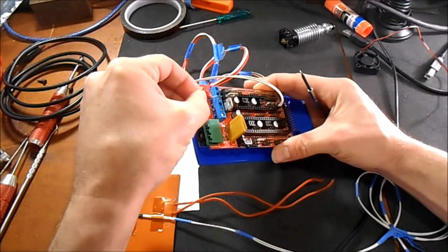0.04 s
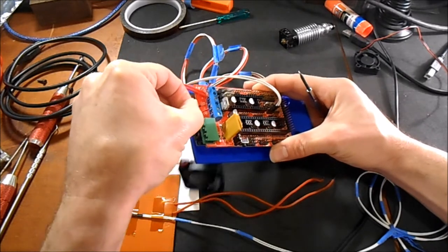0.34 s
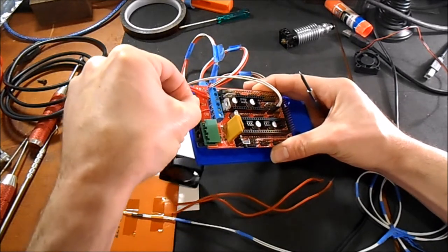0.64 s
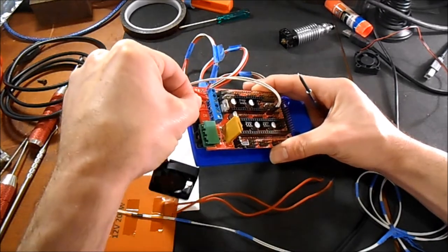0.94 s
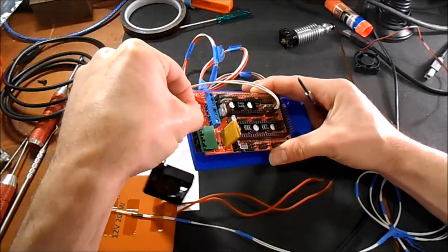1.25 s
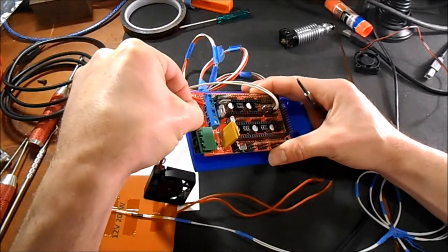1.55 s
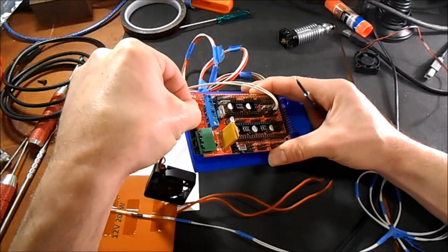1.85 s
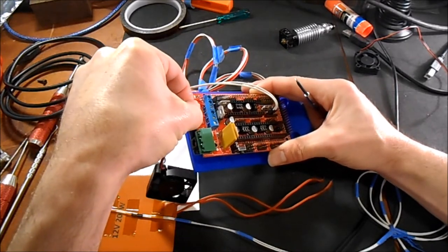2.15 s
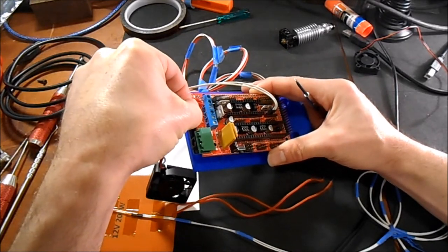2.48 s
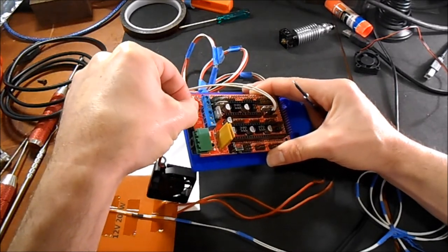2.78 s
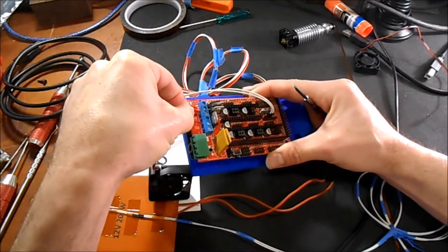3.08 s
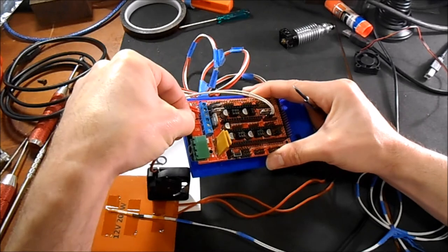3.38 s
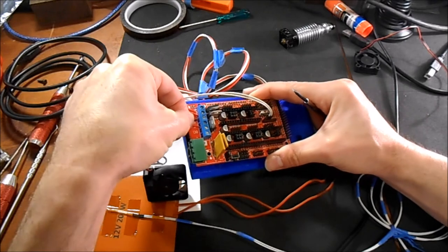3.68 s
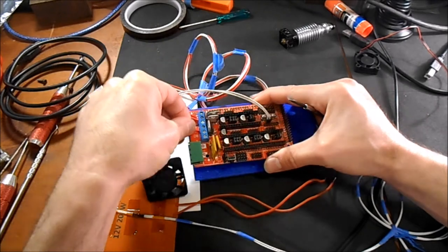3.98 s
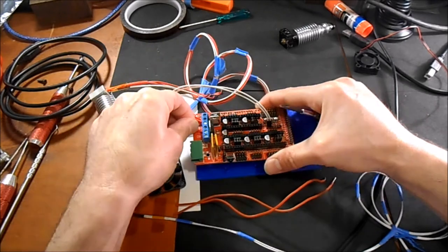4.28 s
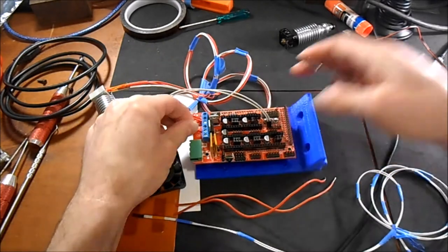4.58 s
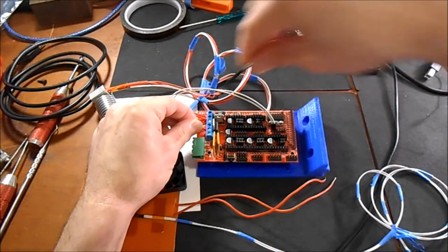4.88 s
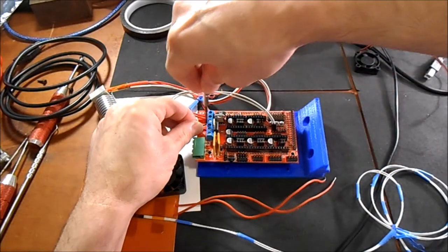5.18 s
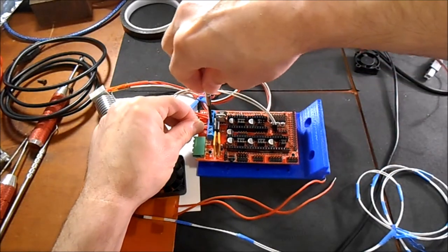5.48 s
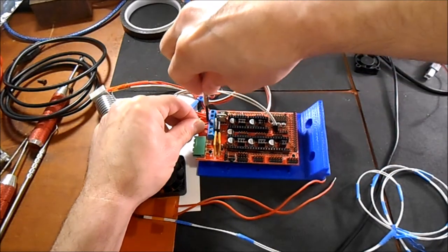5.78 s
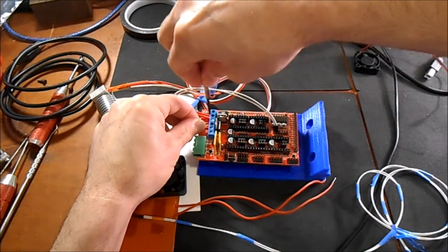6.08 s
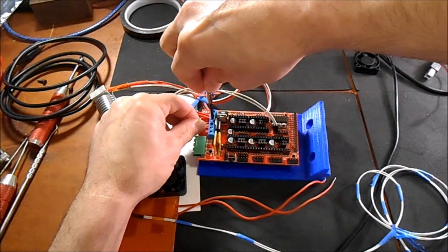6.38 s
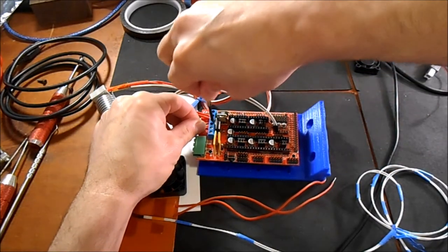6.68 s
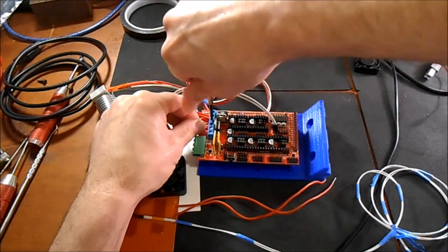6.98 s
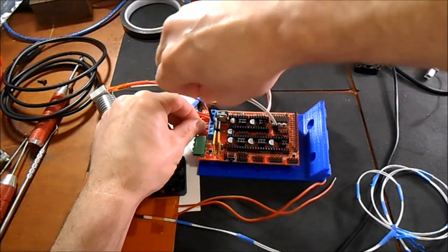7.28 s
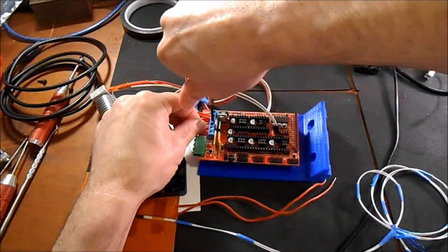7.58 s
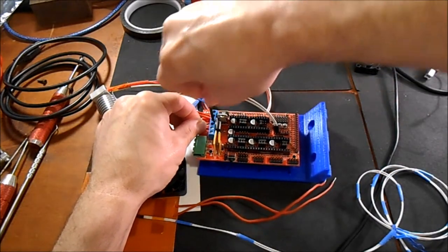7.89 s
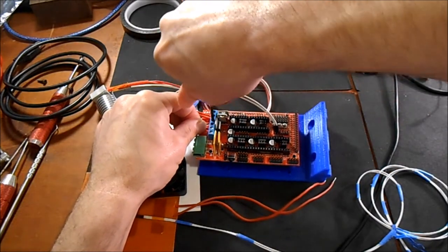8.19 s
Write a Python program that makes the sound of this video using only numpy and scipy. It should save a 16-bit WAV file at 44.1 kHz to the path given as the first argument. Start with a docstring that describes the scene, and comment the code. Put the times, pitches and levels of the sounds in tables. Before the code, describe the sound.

Light, bright clicks of wires and a small screwdriver working at screw terminals, close up, with a faint steady fan behind.

```python
"""Wiring screw terminals at a workbench

One microphone, close to a circuit board in a small room. Wire ends and plugs tick brightly as
they are pushed into the terminals, and insulation rubs in between. Later a small screwdriver
knocks and slips in the screw slots and makes the board ring. The room answers each click,
and a faint fan runs steadily behind."""
import sys
import numpy as np
from scipy import signal
from scipy.fft import rfft, irfft
from scipy.io import wavfile

SR = 44100
rng = np.random.default_rng(int(sys.argv[2]) if len(sys.argv) > 2 else 0)


def store_wav(level_fs):
    """Save 16-bit WAV to argv[1]."""
    pcm = np.round(np.clip(np.atleast_2d(level_fs), -1, 1) * 32767)
    wavfile.write(sys.argv[1], SR, pcm.T.astype(np.int16))


N = 372644

# spectral shape of the fan's rush: frequency_hz, relative_db
FAN_SPECTRUM = [(20, 6.5), (55, 5), (100, -3), (200, 1.5), (400, 1), (1000, -1.5), (1500, 3), (2200, -0.5),
                (3000, -0.5), (4000, -2.5), (6500, -5), (8200, -2.5), (10500, -9)]
# resonances of the fan housing: pitch_hz, width_hz, gain_db
HOUSING_MODES = [(601, 11, -1), (1780, 26, 4.5), (2700, 110, 1)]
# thin whines of the fan: pitch_hz, width_hz, gain_db
FAN_WHINES = [(3720, 12, 3), (4920, 12, 2), (5280, 12, 4), (6720, 14, 2), (9480, 10, 5)]
# resonances of the board and its terminals: pitch_hz, width_hz, gain_db
BOARD_MODES = [(1336, 24, -5.5), (1452, 81, -1), (1605, 98, -2.5), (1698, 57, -1), (1790, 23, 3),
               (2236, 27, 2), (2333, 12, 6.5), (2475, 20, -23), (3010, 200, 10), (3207, 290, 0),
               (3605, 300, 6.5), (4314, 64, 3), (4740, 47, 11), (4806, 120, 5), (5250, 52, 11),
               (6600, 17, -7), (8550, 1400, 10)]
# plug or blade scraping, mostly heard through the board: start_s, length_s, level_db
SCRAPES = [(0.059, 0.12, -58.5), (0.542, 0.025, -53.5), (3.785, 0.024, -51), (4.143, 0.038, -49.5),
           (5.321, 0.023, -59.5), (5.619, 0.019, -54), (5.753, 0.024, -49), (5.794, 0.13, -55),
           (5.944, 0.044, -53), (6.893, 0.089, -52), (7.35, 0.058, -51.5), (7.4, 0.18, -59),
           (7.977, 0.13, -51), (8.257, 0.023, -49.5)]
# insulation sliding, mostly hiss: start_s, length_s, level_db
WIRE_RUBS = [(0.476, 0.027, -44), (0.519, 0.089, -46.5), (4.579, 0.019, -48), (4.615, 0.31, -59),
             (4.978, 0.091, -57.5), (5.206, 0.02, -47.5), (7.697, 0.11, -51.5), (8.36, 0.039, -43.5)]
# borders of the low, middle, high and top band of a contact: edge_hz
BAND_EDGES_HZ = [1290, 2050, 4300, 7000, 11000]
# wire ends and plastic plugs ticking: start_s, level_db, rattle_t60_s, ring_hz, fall_db_per_octave
TICKS = [(0.2121, -33.5, 0.029, 9830, 26), (0.2515, -31, 0.026, 6200, 15.5),
         (0.2551, -24.5, 0.028, 7170, 19), (0.3859, -39.5, 0.03, 2850, 11), (0.3896, -42, 0.027, 2940, 16),
         (0.4847, -41, 0.058, 8000, 16), (0.5112, -35, 0.13, 7950, 13), (0.9456, -48, 0.024, 3000, 5.5),
         (1.224, -50, 0.023, 9590, 5), (1.8974, -44.5, 0.016, 9400, 11), (2.8844, -53.5, 0.035, 2930, 2.5),
         (3.0052, -42.5, 0.022, 9700, 7.5), (3.149, -48.5, 0.0068, 4000, 9), (3.5032, -36, 0.015, 7200, 10),
         (3.794, -50, 0.037, 2880, 5), (4.062, -49.5, 0.039, 3260, 12), (4.1377, -44.5, 0.043, 3200, 9),
         (4.157, -46, 0.07, 4550, 7.5), (4.3883, -36.5, 0.052, 6130, 7.5), (4.392, -33.5, 0.016, 5100, 18),
         (4.419, -44.5, 0.073, 5140, 12), (4.453, -45.5, 0.14, 5000, 14), (4.5985, -38, 0.012, 8800, 9.5),
         (4.6038, -44, 0.036, 5400, 8), (5.194, -43.5, 0.059, 5750, 13), (5.5116, -43.5, 0.017, 6530, 18),
         (5.632, -44, 0.051, 4950, 10.5), (5.8482, -50.5, 0.045, 3010, 8), (6.0515, -40, 0.04, 6140, 12),
         (7.0209, -41.5, 0.023, 5350, 8), (7.04, -42, 0.1, 4670, 10), (7.1067, -44, 0.052, 7540, 5),
         (7.5994, -51, 0.035, 6400, 5.5), (7.682, -49.5, 0.043, 7180, 6), (7.7604, -33.5, 0.021, 6950, 12),
         (8.2851, -38, 0.041, 6560, 11), (8.351, -43.5, 0.038, 7440, 7), (8.368, -29.5, 0.022, 6540, 18.5)]
# the blade knocking in the screw slot: start_s, level_db, rattle_t60_s, ring_hz, low_weight_db
BLADE_KNOCKS = [(5.224, -32.5, 0.043, 1390, 1), (5.332, -49.5, 0.06, 4620, 0.5),
                (5.395, -52.5, 0.049, 1330, 1.5), (5.758, -45, 0.07, 3010, -1.5),
                (5.978, -46, 0.03, 2980, -5.5), (6.1943, -33.5, 0.029, 1590, 3),
                (6.2625, -49, 0.01, 1820, 0), (6.4895, -39.5, 0.02, 3030, -5.5),
                (6.7274, -33, 0.065, 1700, 2.5), (6.7298, -21.5, 0.025, 4900, -0.5),
                (6.837, -41.5, 0.014, 4800, -7), (7.0817, -27.5, 0.016, 3180, -7.5),
                (7.223, -45, 0.02, 3090, -4), (7.3983, -44, 0.027, 3140, -7.5),
                (7.543, -46, 0.036, 3160, -4), (7.6626, -44.5, 0.043, 3100, -8),
                (7.972, -44, 0.019, 4360, -14), (8.0296, -39.5, 0.033, 1800, 1)]
# colour of steel on brass, relative to a knock's level: middle_db, high_db, top_db
STEEL_ON_BRASS_DB = (-0.5, 0, -4)


def from_db(db):
    """Decibels to gain."""
    return 10 ** (np.asarray(db) / 20)


def rms_one(x):
    """Scale to rms 1."""
    return x / np.sqrt(np.mean(x ** 2) + 1e-20)


def band(x, low_hz, high_hz, order=3):
    """Causal band-pass."""
    return signal.sosfilt(signal.butter(order, [low_hz, high_hz], "band", fs=SR, output="sos"), x)


def fade(t, t60_s):
    """Gain that falls by 60 dB in t60_s."""
    return np.exp(-np.log(1000) * t / t60_s)


def resonate(x, modes):
    """The sound itself plus what it sets ringing in each mode."""
    out = x.copy()
    for pitch_hz, width_hz, gain_db in modes:
        radius = np.exp(-np.pi * width_hz / SR)
        feedback = [1, -2 * radius * np.cos(2 * np.pi * pitch_hz / SR), radius ** 2]
        ring = signal.lfilter([1, 0, -1], feedback, x + 1e-18)
        out += from_db(gain_db) * (1 - radius ** 2) / 2 * ring
    return out


def add(track, start_s, sound):
    """Mix a sound into the track at start_s."""
    i = int(start_s * SR)
    track[i:i + len(sound)] += sound[:N - i]


def fan(level_db=-56.5, waver_db=0.5, waver_hz=14, top_hz=11000):
    """In the background, a slightly wavering rush of air with housing resonances and thin whines."""
    hz, db = np.transpose(FAN_SPECTRUM)
    bins_hz = np.fft.rfftfreq(N, 1 / SR)
    colour = from_db(np.interp(np.log(bins_hz + 1), np.log(hz), db)) * (bins_hz < top_hz)
    rush = irfft(rfft(rng.standard_normal(N)) * colour, N)
    waver = rms_one(irfft(rfft(rng.standard_normal(N)) * np.exp(-bins_hz / waver_hz), N))
    return from_db(level_db + waver_db * waver) * rms_one(resonate(rush, HOUSING_MODES + FAN_WHINES))


def strokes(rows, taper=0.35, judder_db=2.5, judders_per_s=90):
    """Gain over time of sliding strokes that swell, hold and let go under uneven finger pressure."""
    gain = np.zeros(N)
    for start_s, length_s, level_db in rows:
        add(gain, start_s, from_db(level_db) * signal.windows.tukey(int(length_s * SR), taper))
    pressure = np.interp(np.arange(N) * judders_per_s / SR, np.arange(N), rng.standard_normal(N))
    return gain * from_db(judder_db * pressure)


def rubbing(slips_per_s=1500, friction=0.29, wire_body_db=-9, scrape_hiss_db=-1.5, gain_db=-0.5):
    """Sliding is a dense run of tiny slips over smooth friction: it hisses and rings the board."""
    slips = rng.standard_normal(N) * ((rng.random(N) < slips_per_s / SR) + friction)
    body = rms_one(band(resonate(slips, BOARD_MODES), low_hz=1400, high_hz=4000))
    hiss = rms_one(band(slips, low_hz=4000, high_hz=9400, order=2))
    wire, scrape = strokes(WIRE_RUBS), strokes(SCRAPES)
    body_gain = scrape + from_db(wire_body_db) * wire
    hiss_gain = wire + from_db(scrape_hiss_db) * scrape
    return from_db(gain_db) * (body_gain * body + hiss_gain * hiss)


def click(t60_s, ring_hz, bands_db, snap=5.0, grit_db=2.0, ring_width_hz=320, ring_db=6.0,
          spread_db=2.5, coupling=0.22, bench_db=-18.5, thump_db=-16, thump_growth=1.65):
    """One hard contact and its dying chatter, sounding through the touched part, board and bench."""
    t = np.arange(SR // 8) / SR
    chatter = rng.standard_normal(len(t)) * from_db(grit_db * rng.standard_normal(len(t)))
    force = chatter * fade(t, t60_s)
    force[0] += snap
    # heavy knocks shake the whole board, light ticks hardly do; each spot drives the modes differently
    low_db = bands_db[0]
    drive_db = coupling * (low_db - max(bands_db))
    modes = [(hz, width, db + drive_db + spread_db * rng.standard_normal())
             for hz, width, db in BOARD_MODES]
    ringing = resonate(force, modes + [(ring_hz, ring_width_hz, ring_db)])
    board_bands = [band(ringing, low, high) for low, high in zip(BAND_EDGES_HZ, BAND_EDGES_HZ[1:])]
    # the bench knocks dully, and its deep give grows faster than the blow
    bench = band(force, low_hz=594, high_hz=1070, order=2)
    thump = band(force, low_hz=100, high_hz=218, order=1)
    parts = [*board_bands, bench, thump]
    gains = from_db([*bands_db, low_db + bench_db, thump_growth * low_db + thump_db])
    attack = SR // 100   # the first 10 ms set each part's level
    return sum(gain * part / np.std(part[:attack]) for gain, part in zip(gains, parts))


def tick(level_db, t60_s, ring_hz, fall_db_per_octave):
    """A small light part: loudest around its own ring, falling away on both sides."""
    centres_hz = np.sqrt(np.multiply(BAND_EDGES_HZ[:-1], BAND_EDGES_HZ[1:]))
    octaves_away = np.abs(np.log2(centres_hz / ring_hz))
    return click(t60_s, ring_hz, level_db - fall_db_per_octave * octaves_away)


def blade_knock(level_db, t60_s, ring_hz, low_weight_db):
    """Steel on a screw: a broad clack, fuller when the blow goes down into the board."""
    return click(t60_s, ring_hz, level_db + np.array([low_weight_db, *STEEL_ON_BRASS_DB]))


def contacts(catches_per_s=8, catch_db=-0.5, catch_hz=4900, top_hz=9900, gain_db=0.68):
    """All ticks and knocks of wire ends, plugs and blade; plastic takes the very top off."""
    out = np.zeros(N)
    for start_s, *contact in TICKS:
        add(out, start_s, tick(*contact))
    for start_s, *contact in BLADE_KNOCKS:
        add(out, start_s, blade_knock(*contact))
    # a sliding part catches now and then with a faint tick
    for start_s, length_s, level_db in WIRE_RUBS + SCRAPES:
        for along, octave in rng.random((round(catches_per_s * length_s), 2)):
            ring_hz = catch_hz * 2 ** (octave - 0.5)
            catch = tick(level_db + catch_db, t60_s=0.033, ring_hz=ring_hz, fall_db_per_octave=5)
            add(out, start_s + length_s * along, catch)
    return from_db(gain_db) * band(out, 40, top_hz, order=6)


def reflections(level_db, t60_s, delay_s):
    """Impulse response of dense, dying echoes that reach the microphone after a short delay."""
    t = np.arange(SR // 2) / SR
    scatter = band(rng.standard_normal(len(t)), low_hz=100, high_hz=8000, order=1)
    echoes = scatter * fade(t, t60_s) * (t > delay_s)
    return from_db(level_db) * echoes / np.linalg.norm(echoes)


def room(x):
    """Quick reflections from the bench and its clutter nearby, then the tail of the small room."""
    early = reflections(level_db=-13.5, t60_s=0.067, delay_s=0.004)
    tail = reflections(level_db=-16, t60_s=0.29, delay_s=0.012)
    return signal.fftconvolve(x, early + tail)[:N]


def scene():
    """In mono: the handling close up, the room around it and the fan behind."""
    handling = contacts() + rubbing()
    return (handling + room(handling) + fan())[None, :]


def record(dry, cutoff_hz=10500):
    """The microphone signal, with its top cut steeply."""
    return signal.sosfilt(signal.cheby1(12, 0.2, cutoff_hz, fs=SR, output="sos"), dry)


dry = scene()
out = record(dry)
store_wav(out)
```